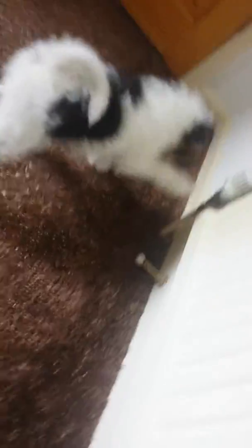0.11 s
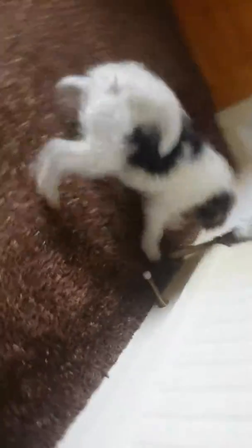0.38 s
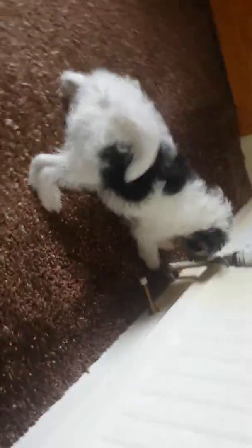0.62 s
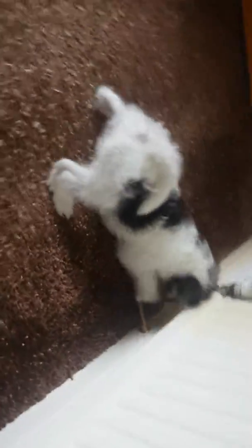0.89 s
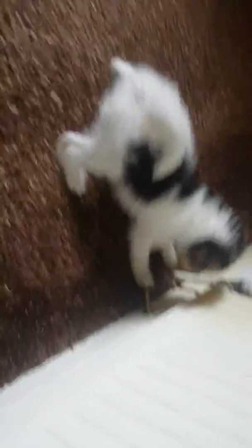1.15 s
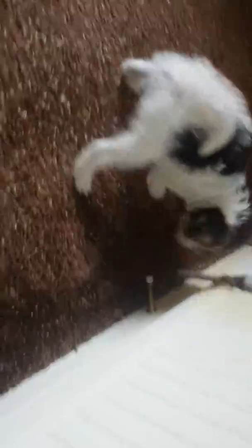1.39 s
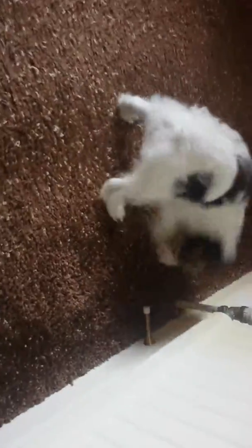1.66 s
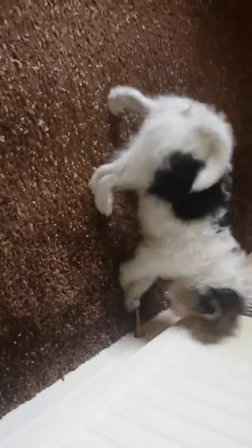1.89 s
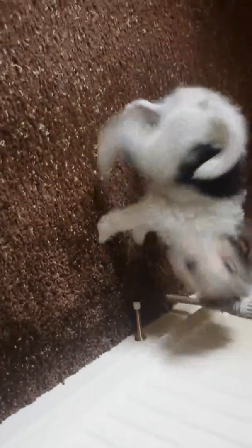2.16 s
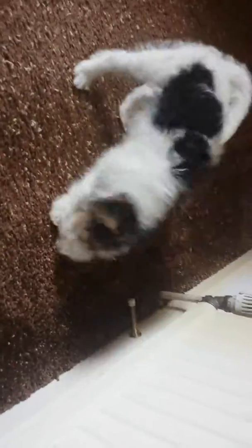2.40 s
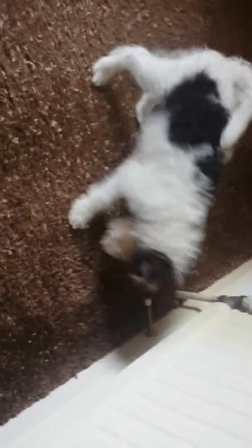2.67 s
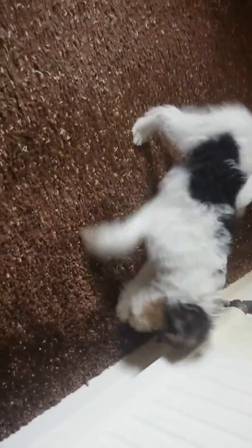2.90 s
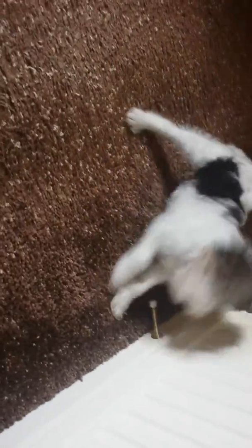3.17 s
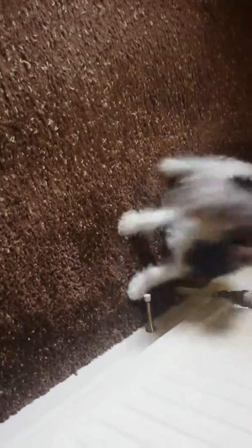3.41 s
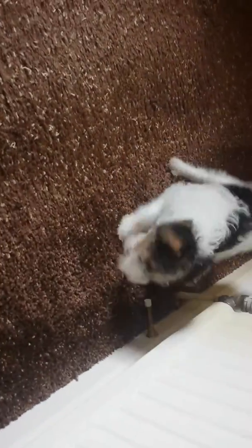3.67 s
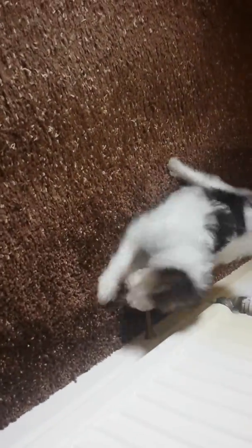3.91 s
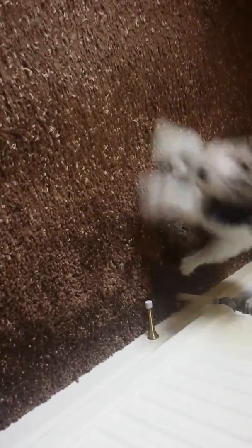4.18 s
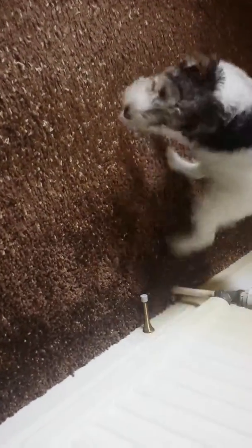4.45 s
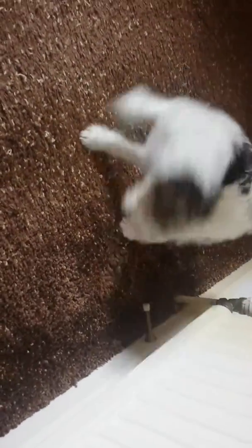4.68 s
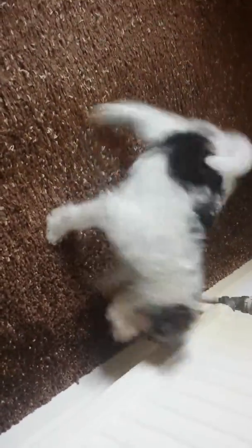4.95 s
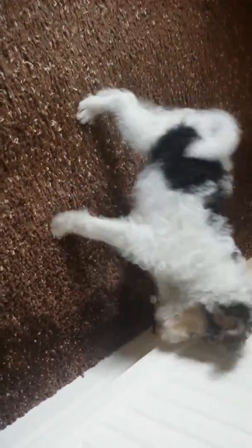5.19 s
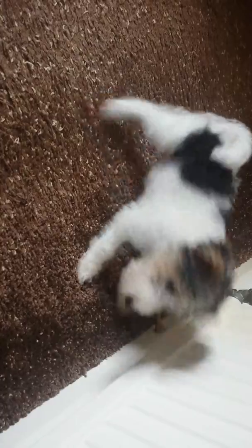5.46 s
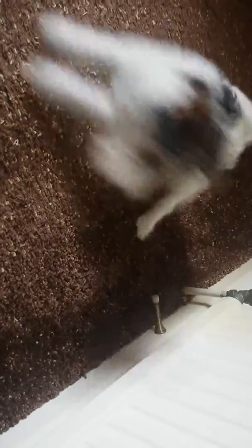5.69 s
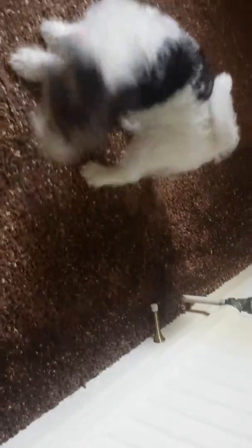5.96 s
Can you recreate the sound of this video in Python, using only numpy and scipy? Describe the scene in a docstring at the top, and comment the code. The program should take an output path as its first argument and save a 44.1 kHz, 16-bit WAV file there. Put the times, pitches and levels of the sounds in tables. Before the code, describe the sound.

After a finger thumps and rubs the microphone, a small dog growls repeatedly with quick breaths and paw scuffs as a door-stop spring twangs against the skirting board.

```python
"""Six bursts of growling from a puppy, which pants between them in a small carpeted room; a spring door stop buzzes.
At first a finger bumps and rubs the left microphone port; paws scuff the carpet over a low room rumble.
Growl: uneven pulse trains and air noise filtered by vocal resonances, plus a pure hum. Breath: fluttering noise.
Spring: clicks exciting decaying modes. Scuffs and the finger's tail: fading band noise. Finger: pressure swings,
lumpy noise and snaps. Feedback delays add the room; coloured noise makes the rumble and hiss."""
import sys
import numpy as np
from scipy import signal
from scipy.fft import rfft, irfft, next_fast_len
from scipy.io import wavfile
from scipy.ndimage import uniform_filter1d

SR = 44100
rng = np.random.default_rng(int(sys.argv[2]) if len(sys.argv) > 2 else 0)


def master(y):
    """Save y as 16-bit WAV."""
    cut = np.clip(np.atleast_2d(y).T, -1, 1)
    pcm = np.round(cut * 32767)  # scale
    wavfile.write(sys.argv[1], SR, pcm.astype(np.int16))


def gain_from_db(level_db):
    """Convert decibel levels to linear amplitude factors (20 dB per decade)."""
    decades = np.asarray(level_db, float) / 20
    return 10 ** decades


N = 268125


def rms_one(x):
    """Normalisation: scale to unit rms."""
    return x / np.sqrt(np.mean(x ** 2) + 1e-20)


def even(x):
    """Envelope flattening: divide out the slow level so that a curve can set it."""
    return x / np.sqrt(uniform_filter1d(x ** 2, size=2600) + 1e-20)


def in_time(rows):
    """Linear interpolation: columns of a table, sample by sample."""
    s, *columns = np.transpose(rows)
    return [np.interp(np.arange(N) / SR, s, c) for c in columns]


def in_bursts(tables):
    """Gating: tables joined end to end, the first column falling to -100 dB between them."""
    rows = []
    for t in tables:
        before = (t[0][0] - .01, -100, *t[0][2:])
        after = (t[-1][0] + .02, -100, *t[-1][2:])
        rows.append([before, *t, after])
    return in_time(np.concatenate(rows))


def at_hz(points, hz):
    """Spectral envelope: read a spectrum on a log-frequency axis."""
    points = np.array(points)
    return np.interp(np.log(np.maximum(hz, 1)), np.log(points[:, 0]), points[:, 1])


def drift(rate_hz):
    """Low-passed random process: slow chance of spread 1."""
    r = np.exp(-2 * np.pi * rate_hz / SR)
    slow = signal.lfilter([1], [1, -2 * r, r * r], rng.standard_normal(N + SR))
    return rms_one(slow[SR:])


def swell_db(full_s, hold_s, rise_db_per_s, fall_db_per_s):
    """Exponential growth and decay: rise to 0 dB at full_s, hold, fall."""
    t = np.arange(N) / SR
    rise = rise_db_per_s * (t - full_s)
    fall = fall_db_per_s * (full_s + hold_s - t)
    return np.minimum(0, np.minimum(rise, fall))


def resonance(x, hz, width_hz):
    """Two-pole resonance whose centre may move, stepped in short blocks."""
    hz, out, state = np.broadcast_to(hz, N), np.zeros(N), [0., 0.]
    r = np.exp(-np.pi * width_hz / SR)
    for i in range(0, N, 256):
        a = [1, -2 * r * np.cos(2 * np.pi * hz[i] / SR), r * r]
        out[i:i + 256], state = signal.lfilter([1 - r, 0, r - 1], a, x[i:i + 256] + 1e-18, zi=state)
    return out


def ring(clicks, hz, t60_s):
    """Impulse response of a damped mode: a unit click starts a decaying sine of height 1."""
    r, w = gain_from_db(-60 / (t60_s * SR)), 2 * np.pi * hz / SR
    return signal.lfilter([0, np.sin(w)], [1, -2 * r * np.cos(w), r * r], clicks + 1e-18)


def strike(clicks, modes):
    """Modal excitation: every click excites each mode with a strength of its own."""
    out = np.zeros(N)
    for hz, level_db, t60_s in modes:
        strength = gain_from_db(level_db + 3.0 * rng.standard_normal(N))
        out += ring(clicks * strength, hz, t60_s)
    return out


def spread(x, twin):
    """Interchannel coherence: ports alike in the bass, more and more of an unrelated twin in the treble."""
    # likeness of left and right: frequency_hz, correlation [0-1]
    likeness = [(60, .98), (300, .95), (640, .86), (1400, .55), (2500, .05), (15000, .02)]
    # balance of left over right: frequency_hz, level_db
    balance = [(60, 0.5), (240, 1), (950, -1.5), (3770, -1.5), (15000, -7.5)]
    hz = np.arange(N // 2 + 1) * SR / N
    alike, lean = at_hz(likeness, hz), gain_from_db(at_hz(balance, hz) / 2)
    mid = rfft(x)
    side = np.sqrt((1 - alike) / (1 + alike)) * rfft(twin)
    return irfft([(mid + side) * lean, (mid - side) / lean], N)


def coloured(spectrum):
    """Spectral shaping: stereo noise of a given colour."""
    hz = np.arange(N // 2 + 1) * SR / N
    one, two = irfft(rfft(rng.standard_normal((2, N))) * gain_from_db(at_hz(spectrum, hz)), N)
    return spread(rms_one(one), rms_one(two))


def room_air(near):
    """Coloured background noise: both layers sink slowly; rumble comes and goes, hiss swells with near sounds."""
    # colour of the rumble: frequency_hz, relative_level_db (per Hz)
    rumble_colour = [(12, -59), (20, -30.5), (27, -39.5), (48, -5.5), (108, -17), (144, -6.5), (220, -30),
                     (290, -70.5), (480, -120)]
    # colour of the hiss: frequency_hz, relative_level_db (per Hz)
    hiss_colour = [(120, -66), (200, -8.5), (252, -7.5), (324, -9), (526, -15.5), (586, -13.5), (630, -9),
                   (870, -17), (1690, -21), (2500, -25.5), (4690, -23.5), (8620, -29), (14500, -33.5)]
    # passing swells of the rumble: peak_s, level_db
    rumble_swells = [(.06, -56.5), (1.95, -48), (3.15, -43), (3.55, -66), (4.2, -54.5), (5.3, -51.5),
                     (5.6, -61), (5.95, -65.5)]
    rumble_start_db, rumble_sink_db_per_s, rumble_swell_db_per_s = -56, 1.9, 43.5
    hiss_start_db, hiss_sink_db_per_s = -57.5, 2
    hiss_below_loud_db, loud_fall_db_per_s = -27.5, 51
    t = np.arange(N) / SR

    # Short-term loudness, held up so that it falls no faster than a steady rate.
    loud_db = 10 * np.log10(uniform_filter1d(near ** 2, size=2000) + 1e-12)
    fall_db = loud_fall_db_per_s * t
    loud_db = np.maximum.accumulate(loud_db + fall_db) - fall_db

    swells = sum(gain_from_db(db - rumble_swell_db_per_s * np.abs(t - s)) for s, db in rumble_swells)
    rumble = np.hypot(gain_from_db(rumble_start_db - rumble_sink_db_per_s * t), swells)
    hiss = np.hypot(gain_from_db(hiss_start_db - hiss_sink_db_per_s * t), gain_from_db(loud_db + hiss_below_loud_db))
    return rumble * coloured(rumble_colour) + hiss * coloured(hiss_colour)


def room(x):
    """Recirculating delay reverberation: eight feedback delays a side, duller on every round."""
    t60_s, wall_cut_hz = 0.29, 7500
    size = next_fast_len(N + SR)
    turn = np.exp(-2j * np.pi * np.arange(size // 2 + 1) / size)   # delay of one sample
    dull = np.exp(-2 * np.pi * wall_cut_hz / SR)
    out = np.zeros((2, size // 2 + 1), complex)
    lags = (rng.uniform(0.0074, 0.038, 16) * SR).astype(int)
    for k, lag in enumerate(lags):
        loss = gain_from_db(-60 * lag / SR / t60_s)
        loop = loss * (1 - dull) / (1 - dull * turn) * turn ** lag
        out[k % 2] += (-1) ** (k // 2) * loop / (1 - loop)
    return irfft(out * rfft(x, size), size)[:, :N]


def finger():
    """Membrane displacement: bumps push it in and it swings back; the lumpy rub ends in snaps."""
    # bumps on the port: start_s, level_db, swing_hz
    bumps = [(0.26, -29.5, 103), (0.32, -32.5, 88), (0.41, -15, 88), (0.46, -26.5, 93), (0.499, -28, 78),
             (0.528, -10.5, 72), (0.539, -6.5, 90)]
    # rub along the port: time_s, level_db (before a gain of 13.5 dB), grit_db (over the lumps)
    rub = [(0.61, -53.5, -32), (0.643, -34.5, -49), (0.714, 4.5, -26), (0.737, 9, -19), (0.747, -30, 3.5),
           (0.76, -38.5, -20)]
    # the skin lets go: time_s, level_db
    snaps = [(0.7274, 2), (.7353, 22)]
    out = np.zeros(N)
    age = np.arange(round(.06 * SR)) / SR
    for s, db, hz in bumps:
        swing = np.exp(-age / 0.01) * np.cos(2 * np.pi * hz * age)
        out[round(s * SR):][:len(age)] -= gain_from_db(db) * swing * np.minimum(age / 0.00064, 1)

    level_db, grit_db = in_time(np.concatenate([[(.6, -100, 0)], rub, [(.76, -100, 0)]]))
    lump_band = signal.butter(2, [52, 170], "band", fs=SR, output="sos")
    grit_band = signal.butter(1, [300, 1500], "band", fs=SR, output="sos")
    lumps = signal.sosfilt(lump_band, rng.standard_normal(N))
    grit = signal.sosfilt(grit_band, rng.standard_normal(N))
    out += gain_from_db(level_db + 13.5) * (even(lumps) + gain_from_db(grit_db) * rms_one(grit * np.abs(lumps)))

    snap = np.zeros(N)
    for s, db in snaps:
        snap[round(s * SR)] = -gain_from_db(db)
    return out + signal.lfilter([1], [1, -1.3, .42], snap)


def fading_bursts():
    """Filtered noise: short bursts that die away exponentially, each with its own resonant colour."""
    # short noise bursts: paws, claws and fur; at .753 and .76 the fading noise after the finger's knock:
    # start_s, level_db, centre_hz, t60_s, sharpness (Q)
    bursts = [(.119, -42, 5900, 0.075, 4.1), (.19, -53.5, 7400, 0.25, 2.2), (.21, -49.5, 7240, 0.17, 3),
              (0.35, -49, 2455, 0.23, 1.4), (0.354, -52, 940, 0.18, 3.9), (0.399, -48.5, 4060, 0.14, 0.29),
              (0.753, -34.5, 4230, 0.37, 0.54), (0.76, -39.5, 600, 0.33, 0.89),
              (1.915, -47, 5998, 0.044, 1.2), (1.996, -49, 6500, .03, 1.5), (2.17, -41.5, 6530, 0.021, 2.2),
              (3.297, -47.5, 1195, 0.1, 1.3), (3.72, -51, 920, 0.079, 1.64),
              (3.942, -59.5, 4705, 0.052, 1.2), (4.007, -40.5, 4684, 0.029, 17),
              (5.252, -43, 4476, 0.11, 1.52), (5.254, -38.5, 9896, 0.082, 1.5),
              (5.79, -55, 250, 0.095, 1.61), (6.042, -54.5, 2400, 0.083, 5)]
    out = np.zeros(N)
    for s, db, hz, t60_s, sharpness in bursts:
        start = round(s * SR)
        age = np.arange(min(round(.25 * SR), N - start)) / SR
        noise = rng.standard_normal(len(age))
        burst = rms_one(signal.lfilter(*signal.iirpeak(hz, sharpness, fs=SR), noise))
        out[start:][:len(age)] += gain_from_db(db - 60 * age / t60_s) * np.minimum(age / 0.0046, 1) * burst
    return out


def spring():
    """Modal vibration: the swinging coil slaps the skirting board; a dense winding rattle fills the gaps."""
    # modes of the board: frequency_hz, level_db, t60_s
    board_modes = [(476, -39, 0.05497), (674, -3.5, 0.11), (918, -2, 0.026), (1100, -6.5, 0.023),
                   (1426, -5.5, 0.012), (1825, -6.5, 0.014), (2400, -14.5, 0.0051)]
    # modes of the coil: frequency_hz, level_db, t60_s
    coil_modes = [(4180, -9, 0.036), (4650, -5, 0.0077), (6200, -1, 0.0024), (7040, -9, 0.0088),
                  (8800, -1.5, 0.0018), (10850, -8, 0.0008)]
    # loudest slaps: time_s, board_db, coil_db (levels of the driving clicks)
    slaps = [(.954, -26, -29.5), (.984, -34, -36), (1.014, -28, -33), (1.041, -16, -28),
             (1.062, -20, -30.5), (1.084, -25.5, -36.5), (1.107, -29.5, -37), (1.129, -34, -41),
             (1.149, -32, -42), (1.171, -34, -51), (1.194, -25, -43), (1.229, -36, -45), (1.264, -42, -44),
             (1.283, -35, -49)]
    pluck_s, hold_s, buzz_db = 0.95, 0.12, -32
    coil_under_board_db, coil_late_s = -18, 0.056   # the windings sing fullest a little later
    board_db = buzz_db + swell_db(pluck_s, hold_s, 502, 59.5)
    coil_db = buzz_db + coil_under_board_db + swell_db(pluck_s + coil_late_s, hold_s, 170, 45)
    coil_db = np.minimum(coil_db, board_db)

    clicks = rng.random(N) < 900 / SR   # about 900 clicks per second
    rattle = clicks * rng.standard_normal(N) * gain_from_db(3.3 * drift(49.07))
    buzz = gain_from_db(board_db) * even(strike(rattle, board_modes))
    buzz = buzz + gain_from_db(coil_db) * even(strike(rattle, coil_modes))

    s, slap_db, tick_db = np.transpose(slaps)
    board, coil = np.zeros((2, N))
    board[(s * SR).astype(int)] = gain_from_db(slap_db)
    coil[(s * SR).astype(int)] = gain_from_db(tick_db)
    soft = signal.lfilter([.2], [1, -.8], board)   # the rubber tip softens the blow
    return buzz + strike(soft, board_modes) + strike(coil, coil_modes)


def breath():
    """Turbulence: fluttering air noise around a moving mouth centre and in fixed nose resonances."""
    # puffs of air: full_s, hold_s, mouth_db, mouth_centre_hz, nose_db (over mouth)
    exhalations = [(1.91, .05, -55, 2278, -3.5), (2.06, 0.032, -45, 1850, -7.5),
                   (2.314, 0.034, -46, 1950, -5), (2.845, .12, -52, 3106, -24),
                   (3.002, 0.092, -59, 3100, -7), (3.204, 0.048, -66, 2650, -19),
                   (3.347, 0.042, -53, 1671, -9), (3.485, 0.039, -41.5, 1760, -11),
                   (3.557, .06, -48.5, 1960, -7), (4.094, 0.032, -48.5, 1973, -11),
                   (4.158, 0.036, -37.5, 2268, -10.5), (4.672, 0.033, -51, 1948, -10),
                   (5.1, 0.039, -58.5, 2607, 16.5), (5.146, 0.027, -61, 2930, 5),
                   (5.181, .02, -53.5, 2170, -6.5), (5.262, 0.02, -50.5, 2076, 4)]
    # nose resonances: frequency_hz, width_hz, level_db
    nose_modes = [(3830, 84, 11), (4340, 610, 10), (6680, 480, 1), (11200, 670, -29)]
    rise_db_per_s, fall_db_per_s = 620, 317
    shapes = [gain_from_db(db + swell_db(s, hold, rise_db_per_s, fall_db_per_s)) for s, hold, db, *_ in exhalations]
    shapes = np.array(shapes) + 1e-30
    total = shapes.sum(axis=0)
    centre_hz, nose_db = np.transpose(exhalations)[3:] @ shapes / total   # the strongest puff sets the colour

    air = rng.standard_normal(N) * gain_from_db(1.95 * drift(110))
    nose = sum(gain_from_db(db) * resonance(air, hz, width_hz) for hz, width_hz, db in nose_modes)
    mouth = resonance(resonance(air, centre_hz, 600), centre_hz, 1100)
    upper_hz = 1.44 * centre_hz   # second resonance of the open mouth
    mouth = mouth + gain_from_db(-9.5) * resonance(resonance(air, upper_hz, 490), upper_hz, 730)
    return total * (rms_one(mouth) + gain_from_db(nose_db) * rms_one(nose))


def growl_controls():
    """Source-filter coupling: throat and hum follow mouth opening and pulse rate around each growl's colour."""
    # growls: time_s, chest_db (effort), pitch_hz (pulse rate), mouth_db (opening, over chest)
    bursts = [
        [(.86, -61, 145, -20), (.885, -35, 148.5, -24.5), (.958, -32.5, 157.1, -13.5),
         (1.002, -33, 152.9, -9.5), (1.062, -28.5, 123.9, -15), (1.098, -30, 122.6, -13), (1.17, -62, 118, -10)],
        [(1.625, -69, 126, -14.5), (1.636, -43.5, 124.2, -12.5), (1.662, -56, 123.3, -14),
         (1.69, -36, 120, -20.5), (1.838, -30, 122.3, -27), (1.898, -36, 148.6, -16.5), (1.95, -34, 146.5, -6),
         (2.016, -27.5, 124.1, -13.5), (2.07, -26.5, 127.1, -4), (2.1, -37.5, 125.8, -16.5),
         (2.2, -56, 127, -12)],
        [(2.72, -51, 124.3, -24.5), (2.762, -37, 124.6, -27), (2.88, -26, 125.1, -14), (2.955, -29, 130.6, -14),
         (3.01, -24.5, 121.8, -29.5), (3.068, -30.5, 117.2, -16), (3.122, -28.5, 118.4, -18.5),
         (3.176, -26.5, 127.8, -19), (3.215, -24, 126.3, -14), (3.32, -51.5, 125.7, -7)],
        [(3.452, -66, 127, -9.5), (3.462, -37, 129.4, -3), (3.5, -35, 131.4, 5), (3.545, -27.5, 126.1, -13),
         (3.606, -42.5, 126.1, -9), (3.7, -69, 126, -12)],
        [(3.975, -89, 126.7, -24.5), (3.99, -48, 125.8, -27.5), (4.018, -28.5, 127.5, -27.5),
         (4.05, -31, 125.7, -12.5), (4.075, -31.5, 123.2, -17), (4.165, -29, 126.9, -9),
         (4.21, -42, 126.8, -3.5), (4.23, -48, 127.9, -10), (4.32, -69, 133, -12)],
        [(5.025, -54, 144.1, -20), (5.074, -34, 145.1, -7.5), (5.12, -35, 145, 2.5), (5.16, -34, 146.4, 0.5),
         (5.22, -34.5, 148.8, -8), (5.276, -34.5, 157.3, -1), (5.318, -29, 152.1, -7.5),
         (5.385, -29.5, 124.7, -16), (5.405, -42.5, 127.1, -19), (5.47, -49.5, 132.9, -23),
         (5.56, -69, 130.6, -18)],
    ]
    # colour at middling opening: throat_start_db, throat_end_db, hum_db (all over chest), mouth_hz (mid-growl)
    voices = [(-17, 7, -7.5, 1180), (-4.5, -21.5, -10.5, 1163), (-2, -20, -10, 1186),
              (-17.5, -15, -8.5, 1396), (-7.5, -19, -7.5, 1146), (-13, -19.5, -3.5, 1267)]
    # how unevenly the folds beat: time_s, roughness [0-1]
    roughness = [(.9, .42), (.97, .25), (1.08, .12), (1.7, .36), (1.84, .2), (1.94, .4), (2.05, .26),
                 (2.76, .4), (2.97, .42), (3.0, .22), (3.2, .14), (3.25, .4), (3.5, .3), (3.55, .12),
                 (4.02, .2), (4.06, .36), (4.15, .3), (5.06, .44), (5.3, .4), (5.38, .2)]
    mid_open_db, mid_rate_hz, full_effort_db = -12, 130, -32
    chest_db, pitch_hz, mouth_db = in_bursts(bursts)
    ends = []
    for g, (throat_start_db, throat_end_db, hum_db, mouth_hz) in zip(bursts, voices):
        start_s, end_s = g[0][0], g[-1][0]
        half_s = (end_s - start_s) / 2
        ends.append((start_s, throat_start_db, hum_db, mouth_hz, -half_s))
        ends.append((end_s, throat_end_db, hum_db, mouth_hz, half_s))
    throat_db, hum_db, mouth_hz, past_middle_s = in_time(ends)

    wide, high = mouth_db - mid_open_db, pitch_hz - mid_rate_hz
    throat_db = throat_db + 0.134 * wide + 0.5282 * high
    # Below full effort the hum fades more slowly than the chest, past the middle of the growl.
    late = np.clip(full_effort_db - chest_db, 0, 25) * (past_middle_s > 0)
    hum_over_chest_db = hum_db + 0.85 * wide + 0.49 * high + 0.6 * late
    hum_db = chest_db + np.minimum(hum_over_chest_db, 5.5)
    mouth_hz = mouth_hz + 200 * past_middle_s   # climbs 200 Hz per second through each growl
    rough = np.clip(in_time(roughness)[0], 0, 1)
    return chest_db, pitch_hz, throat_db, mouth_db, mouth_hz, rough, hum_db


def vocal_folds(pitch_hz, rough):
    """Glottal pulse excitation: uneven fold pulses, with a puff of air each cycle; the rasp has more air."""
    cycles = np.cumsum(pitch_hz * (1 + .2 * rough * drift(40))) / SR
    # Each pulse has its own strength.
    sizes = gain_from_db(3.2 * rough * rng.standard_normal(1200)[cycles.astype(int)])
    pulses = rms_one((np.diff(np.floor(cycles), prepend=0) > 0) * sizes)
    air = rms_one(rng.standard_normal(N) * np.exp(-2.2 * (cycles % 1)) * sizes)
    folds = pulses + 1.1 * rough * air
    rasp = pulses + .8 * air
    return folds, rasp


def growl():
    """Source-filter voice: the folds ring chest, throat and mouth, and a pure hum lies beneath."""
    # chest resonances: frequency_hz, width_hz, level_db
    chest_modes = [(250, 67.5, 24), (411, 470, -9.5)]
    chest_db, pitch_hz, throat_db, mouth_db, mouth_hz, rough, hum_db = growl_controls()
    folds, rasp = vocal_folds(pitch_hz, rough)

    chest = np.zeros(N)
    for k, (hz, width_hz, db) in enumerate(chest_modes):
        chest += gain_from_db(db) * (-1) ** k * resonance(folds, hz, width_hz)
    chest = signal.sosfilt(signal.butter(4, [130, 520], "band", fs=SR, output="sos"), chest)

    throat_hz = 609
    throat = resonance(resonance(folds + rasp, throat_hz, 86), throat_hz, 420)
    throat = signal.sosfilt(signal.butter(4, 800, fs=SR, output="sos"), throat)

    mouth = resonance(rasp, mouth_hz, 131) - gain_from_db(-15.5) * resonance(rasp, 1.436 * mouth_hz, 250)
    # The band edge leaves a dark valley under the mouth band.
    mouth = signal.sosfilt(signal.butter(3, [1000, 2300], "band", fs=SR, output="sos"), mouth)

    # A pure low tone without overtones follows the pulse rate only in part.
    home_hz, follows, waver = 143.6, 0.51, 0.029
    hum_hz = (home_hz + follows * (pitch_hz - home_hz)) * (1 + waver * drift(29))
    hum = gain_from_db(hum_db) * np.sin(2 * np.pi * np.cumsum(hum_hz) / SR)
    voice = even(chest) - gain_from_db(throat_db) * even(throat) + gain_from_db(mouth_db) * even(mouth)
    return hum + gain_from_db(chest_db) * voice


def scene():
    """Superposition: dog, spring and fading bursts in the room; the finger's pushes reach the left port only."""
    near = growl() + breath() + spring() + fading_bursts()
    # Floor and furniture scatter the treble.
    scatter = rng.standard_normal(1500) * np.exp(-np.arange(1500) / 300)
    scattered = signal.fftconvolve(near, scatter / np.linalg.norm(scatter))[:N]
    direct = spread(near, scattered)
    return direct + gain_from_db(-21) * room(near) + room_air(near) + finger() * [[1], [0]]


def band_limit(x):
    """A steep low-pass at the top of the band."""
    return signal.sosfilt(signal.butter(12, 15710, fs=SR, output="sos"), x)


def record(dry):
    """Dynamic range limiting: a shared limiter ducks under loud peaks and recovers; soft clip, low-pass."""
    threshold_db, recovery_db_per_s, ceiling = -12, 260, .92
    peak_db = 20 * np.log10(np.abs(dry).max(axis=0) + 1e-9)
    over_db = np.maximum(peak_db - threshold_db, 0)
    slope = recovery_db_per_s * np.arange(N) / SR
    duck_db = uniform_filter1d(np.maximum.accumulate(over_db + slope) - slope, size=200)
    # The gain falls by 0.6 of the held excess, so it recovers at 0.6 of that rate.
    held = ceiling * np.tanh(dry * gain_from_db(-.6 * duck_db) / ceiling)
    mix = signal.sosfilt(signal.cheby2(8, 40, 15600, fs=SR, output="sos"), held)
    return band_limit(mix)


dry = scene()
out = record(dry)
master(out)
```